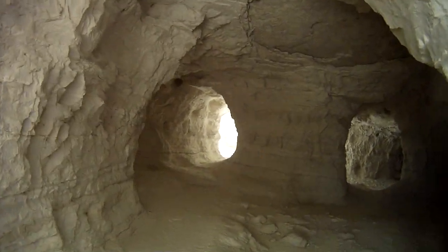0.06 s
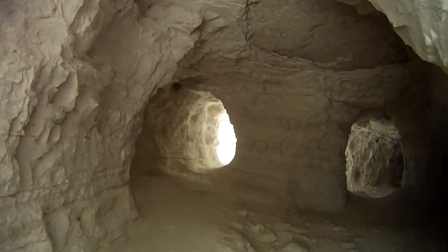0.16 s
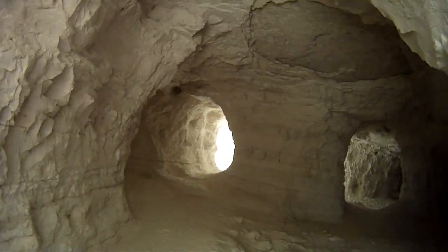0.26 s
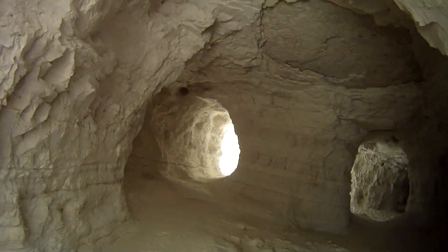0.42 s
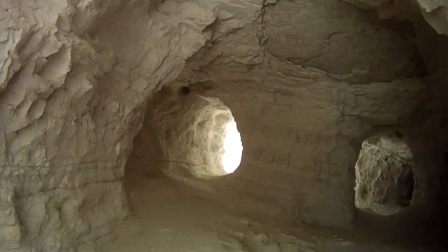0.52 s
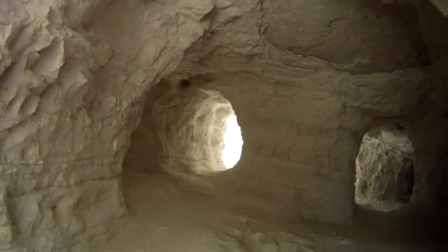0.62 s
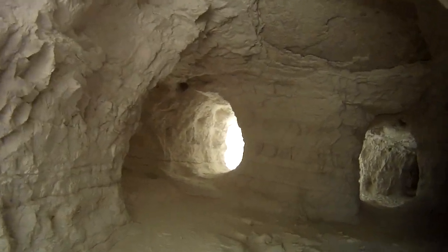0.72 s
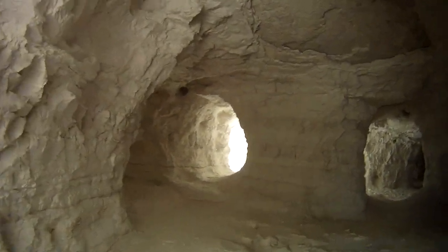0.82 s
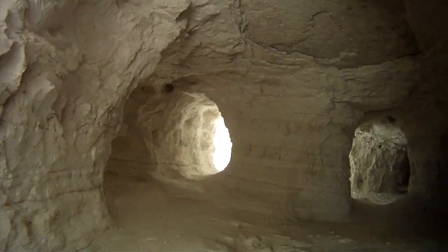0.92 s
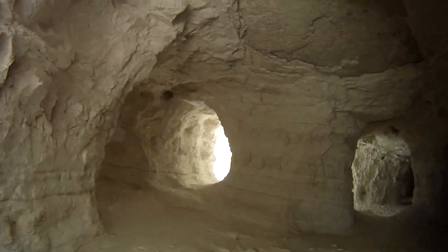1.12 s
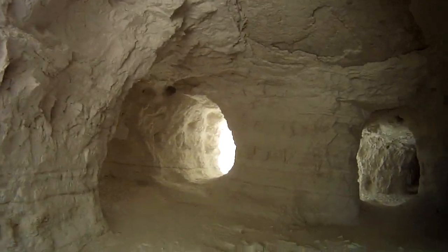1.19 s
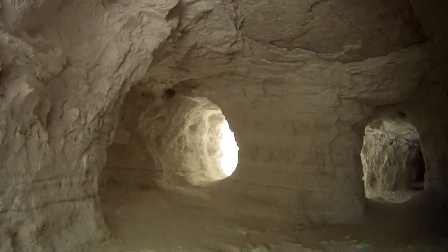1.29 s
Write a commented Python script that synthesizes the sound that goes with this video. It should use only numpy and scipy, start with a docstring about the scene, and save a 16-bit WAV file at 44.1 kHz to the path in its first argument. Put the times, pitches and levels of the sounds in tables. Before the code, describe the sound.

A sharp hollow knock on a small hard case comes early, very close to the microphone; then soles scrape and grind quietly over grit, small stone chips tick, with low handling rumble inside a rock tunnel.

```python
"""Mine tunnel: slow steps on loose rubble, heard through the hard case of a hand-held camera.
Three quick contacts make one sharp knock that rings the case as a bank of dying sines.
Soles scrape and grind over grit, random slips ringing resonances; small chips tick as short struck modes.
Shaped noise gives the handling rumble and a faint hiss below.
The recorder holds each sample, which mirrors the sound into the treble."""
import sys
import numpy as np
from scipy import signal
from scipy.fft import rfft, irfft
from scipy.io import wavfile
from scipy.ndimage import uniform_filter1d

SR = 44100
rng = np.random.default_rng(int(sys.argv[2]) if len(sys.argv) > 2 else 0)


def to_wav(s):
    """Save 16-bit WAV."""
    ch = np.atleast_2d(s).T  # columns
    pcm = np.round(np.clip(ch, -1, 1) * 32767)  # PCM
    wavfile.write(sys.argv[1], SR, pcm.astype(np.int16))


N = 59535
T = np.arange(N) / SR


def from_db(db):
    """Decibels to gain."""
    return 10 ** (np.asarray(db) / 20)


def rms_one(x):
    """Scale to rms 1."""
    return x / np.sqrt(np.mean(x ** 2) + 1e-20)


def evened(x, size):
    """Hold the level near 1 over stretches of size samples."""
    power = uniform_filter1d(uniform_filter1d(x * x, size), size)
    return x / np.sqrt(power + 1e-12)


def high_pass(x, hz, order):
    """Cut what lies below hz."""
    return signal.sosfilt(signal.butter(order, hz, "high", fs=SR, output="sos"), x)


def noise(spectrum):
    """White noise filtered to the given spectrum; rms 1."""
    hz, db = np.transpose(spectrum)
    bins = np.maximum(np.fft.rfftfreq(N, 1 / SR), 1)
    gain = from_db(np.interp(np.log(bins), np.log(hz), db))
    return rms_one(irfft(rfft(rng.standard_normal(N)) * gain, N))


def decay(start, t60):
    """Exponential fade from 1 at start, down 60 dB after t60 seconds."""
    age = np.maximum(T - start, 0)
    return np.exp(-np.log(1000) * age / t60)


def ring(start, hz, t60):
    """A struck mode: a dying sine that starts at height 1."""
    age = np.maximum(T - start, 0)
    return np.sin(2 * np.pi * hz * age) * decay(start, t60)


GRAINS_PER_S, GRAIN_SPREAD_DB = 1200, 3   # slips of grit under a sole; mean of their random boost


def friction(colour):
    """Dense slips of uneven size ring a set of steep resonances; level near 1."""
    boost_db = GRAIN_SPREAD_DB * np.minimum(rng.exponential(1, N), 5)
    sizes = from_db(boost_db) * rng.choice([-1, 1], N)
    slips = sizes * (rng.random(N) < GRAINS_PER_S / SR) + 1e-18
    out = 0
    for hz, width, db in colour:
        r = np.exp(-np.pi * width / SR)
        g = (1 - r * r) / 2
        section = [g, 0, -g, 1, -2 * r * np.cos(2 * np.pi * hz / SR), r * r]
        # the same resonator twice makes steep sides
        out = out + from_db(db) * signal.sosfilt([section, section], slips)
    return evened(out, size=280)


RISE_SHARE, FALL_SHARE = 0.9, 0.86   # bell spread as a share of a stroke's half length


def swells(rows):
    """Each stroke is a bell curve that falls slightly faster than it rises; their powers add."""
    power = 0
    for middle, half, db in rows:
        spread = half * np.where(T < middle, RISE_SHARE, FALL_SHARE)
        power = power + from_db(db) ** 2 * np.exp(-.5 * ((T - middle) / spread) ** 2)
    return np.sqrt(power)


# handling rumble, its movement before the trim: (time [s], level [dB])
RUMBLE_LEVEL = [(0.0, -54), (0.13, -58), (0.168, -47), (0.274, -56.5), (0.344, -49.5), (0.372, -58),
                (0.406, -42.5), (0.45, -54.5), (0.532, -56.5), (0.62, -49), (0.752, -58), (0.972, -52.5),
                (0.996, -57.5), (1.134, -51.5), (1.222, -59), (1.244, -53), (1.318, -69), (1.35, -50.5)]
# handling rumble, relative spectrum: (frequency [Hz], density [dB per Hz])
RUMBLE = [(10, -8.5), (22, -2), (45, 1.5), (72, -6.5), (95, -10.5), (145, -29.5), (400, -38), (1000, -112)]
RUMBLE_TRIM_DB = 0.5


def rumble():
    """Handling of the carried camera: low noise that swells and sinks."""
    level_db = RUMBLE_TRIM_DB + np.interp(T, *np.transpose(RUMBLE_LEVEL))
    return from_db(level_db) * evened(noise(RUMBLE), size=1200)


# hiss, relative spectrum, also the colour of the tunnel tail: (frequency [Hz], density [dB per Hz])
HISS = [(60, 1), (150, 7.5), (250, 3), (450, 1), (700, 1), (1000, -4), (1400, -1), (1900, -6.5), (2280, 0),
        (2900, -7), (3600, -11), (5000, -12), (6000, -15)]
HISS_DB = -60


def hiss():
    """Faint steady noise."""
    return from_db(HISS_DB) * noise(HISS)


# soles scrape over grit: (middle time [s], half length [s], level [dB], pressure [0-1])
SCRAPES = [(0.019, 0.014, -58.5, 0.44), (0.17, 0.0074, -61.5, 0.4), (0.34, 0.0042, -57, 0),
           (0.426, 0.007, -55.5, 0), (0.533, 0.016, -60.5, 0.4), (0.607, 0.011, -54.5, 0.16),
           (.648, 0.0055, -56.5, .4), (.660, 0.0023, -43, .95), (0.71, 0.023, -61.5, .2),
           (.746, 0.0027, -42, 0.3), (0.755, .006, -45.5, 0), (0.789, 0.011, -48, .3),
           (0.813, 0.0048, -47.5, 1), (0.84, 0.0087, -47, 0), (0.904, 0.0073, -47.5, 1),
           (0.917, 0.0031, -44, 1), (0.935, 0.0099, -51, 0.33), (0.959, 0.0031, -50, 0),
           (1.002, 0.004, -56, 0.3), (1.05, 0.0051, -65, 0.7), (1.101, 0.0053, -56, .3),
           (1.16, .006, -49, 0.9), (1.174, 0.0028, -49.5, 0.1), (1.23, 0.031, -66, 0),
           (1.247, 0.0035, -52, 0.43), (1.348, 0.0027, -51.5, 1)]
# resonances of a light scrape: (frequency [Hz], width of one pass [Hz], level [dB])
LIGHT_COLOUR = [(1130, 1160, -13), (1625, 188, -3.5), (2020, 187, 0), (2235, 210, 3.5), (2564, 200, -10),
                (3280, 700, -19), (2230, 4300, -32)]
# resonances of a pressed scrape: (frequency [Hz], width of one pass [Hz], level [dB])
PRESSED_COLOUR = [(2037, 277, 4.5), (2295, 57, -10), (2780, 230, -9), (3270, 310, -6.5), (3635, 78, -13),
                  (5310, 530, -18)]


def scrapes():
    """Soles slip over grit; pressure shifts the power from the light colour to the pressed one."""
    middle, half, db, pressure = np.transpose(SCRAPES)
    pressure = np.clip(pressure, .01, .99)
    light_db = db + 10 * np.log10(1 - pressure)
    pressed_db = db + 10 * np.log10(pressure)
    light = friction(LIGHT_COLOUR) * swells(zip(middle, half, light_db))
    pressed = friction(PRESSED_COLOUR) * swells(zip(middle, half, pressed_db))
    return high_pass(light + pressed, hz=430, order=2)


# hollow grinding as weight comes on: (middle time [s], half length [s], level [dB])
GRINDS = [(.012, 0.0078, -60), (.612, 0.0063, -56), (.670, 0.0034, -48), (.70, .008, -57.5),
          (.812, 0.0089, -44.5), (.903, 0.0057, -44), (.9235, 0.0058, -33.5), (.936, .003, -64),
          (.98, 0.015, -56.5), (1.061, 0.0025, -55), (1.154, 0.0034, -52), (1.167, 0.0028, -38),
          (1.178, 0.0047, -50)]
# resonances of grinding: (frequency [Hz], width of one pass [Hz], level [dB])
GRIND_COLOUR = [(628.6, 62, 14.5), (830, 89, 0), (905, 61, -22.5), (774, 510, -16)]


def grinds():
    """Grit slips under the weight and rings low, hollow resonances."""
    return high_pass(friction(GRIND_COLOUR) * swells(GRINDS), hz=600, order=6)


# contacts of the sharp knock: (time [s], level [dB], brightness [dB per octave])
CONTACTS = [(0.20687, -11.5, 7.5), (0.20863, -11.5, -10), (0.20987, -7, -5.5)]
# modes of the camera case: (frequency [Hz], level [dB], t60 [s])
CASE = [(350, -31.5, .21), (591, -24, .033), (645, -19, .065), (711, -52, .3), (828, -14, .028),
        (929, -25, .053), (1147, -21.5, .16), (1650, -46, .08), (2020, -9, .016), (2300, -30, .05),
        (2660, -25, .026), (3250, -19, .025), (3760, -39, .04), (5230, -38, .022)]
PIVOT_HZ = 1360   # brightness tilts the modes about this pitch
CASE_EDGE_HZ = 477   # the small case radiates little below this pitch
RATTLE_DB, RATTLE_T60_S = -36.5, 0.079   # small grit rattles against the case after the knock
TAIL_DB, TAIL_T60_S = -52, 0.4   # the tunnel's answer


def knock():
    """A bright first touch, a bounce and a duller full blow ring the case; grit rattles briefly and the tunnel
    answers faintly."""
    case = 0
    for start, db, tilt in CONTACTS:
        for hz, mode_db, t60 in CASE:
            tilt_db = tilt * np.log2(hz / PIVOT_HZ)
            case = case + from_db(db + mode_db + tilt_db) * ring(start, hz, t60)
    first = CONTACTS[0][0]
    rattle = from_db(RATTLE_DB) * friction(PRESSED_COLOUR) * decay(first, RATTLE_T60_S)
    tail = from_db(TAIL_DB) * noise(HISS) * decay(first, TAIL_T60_S)
    return high_pass(case, CASE_EDGE_HZ, order=4) + (T > first) * (rattle + tail)


# chips of stone tick: (time [s], level [dB])
TICKS = [(.5865, -44.5), (.652, -42), (.6835, -32), (.6915, -36), (.697, -40.5), (.7005, -44), (.704, -47),
         (.744, -59), (.8225, -43.5), (.8555, -44.5)]
# modes of a chip before detuning: (frequency [Hz], level [dB], t60 [s])
CHIP = [(3100, -20, 0.0056), (3410, -0.5, 0.0098), (3970, -18, .009), (4440, -20, 0.021),
        (4750, -10, 0.0073)]
TICK_ATTACK_S = 0.00037
CHIP_DETUNE = 0.023   # random spread of each mode, as a share of its pitch


def chips():
    """Small stones tick with a blunt attack, each ringing at slightly different pitches."""
    out = 0
    for start, db in TICKS:
        attack = 1 - np.exp(-(np.maximum(T - start, 0) / TICK_ATTACK_S) ** 2)
        for hz, mode_db, t60 in CHIP:
            pitch = hz * (1 + CHIP_DETUNE * rng.standard_normal())
            out = out + attack * from_db(db + mode_db) * ring(start, pitch, t60)
    return out


def scene():
    """All sources at one microphone."""
    return (rumble() + hiss() + scrapes() + grinds() + knock() + chips())[None]


INPUT_EDGE_HZ, HOLD_HZ, CUTOFF_HZ = 5336, 12000, 15600   # input low-pass, sampling rate, final low-pass


def record(dry):
    """The recorder samples slowly and holds each value, mirroring the band upward; then the top is cut."""
    band = signal.sosfilt(signal.butter(12, INPUT_EDGE_HZ, fs=SR, output="sos"), dry)
    fine = signal.resample_poly(band, 4 * HOLD_HZ, SR, axis=1)
    held = np.repeat(fine[:, ::4], 4, axis=1)   # one value in four, held for four
    out = signal.resample_poly(held, SR, 4 * HOLD_HZ, axis=1)[:, :N]
    return signal.sosfilt(signal.ellip(10, .2, 80, CUTOFF_HZ, fs=SR, output="sos"), out)


dry = scene()
out = record(dry)
to_wav(out)
```